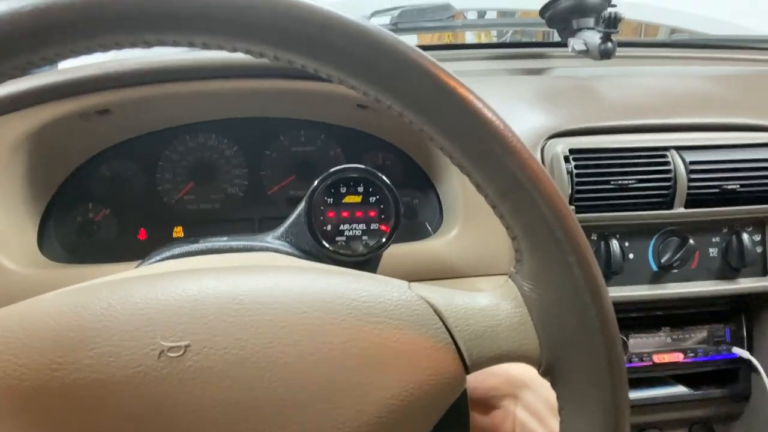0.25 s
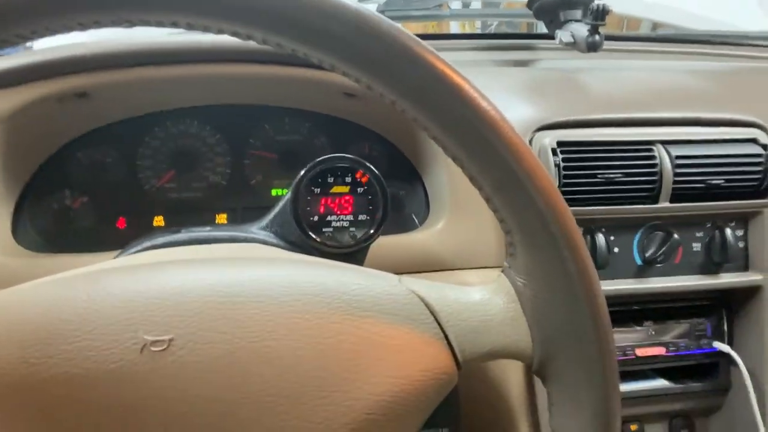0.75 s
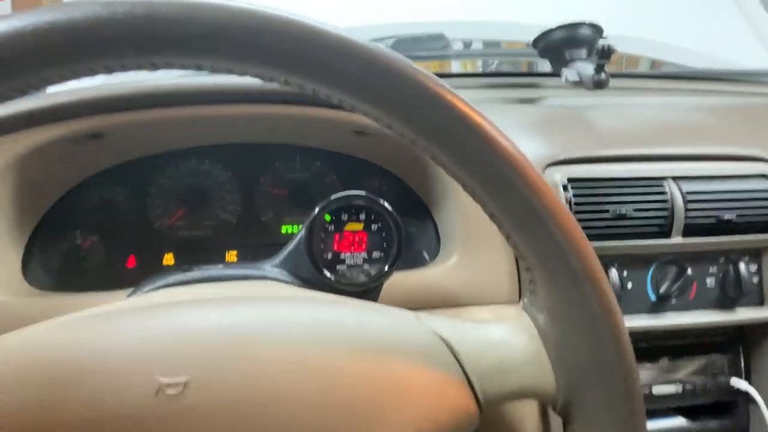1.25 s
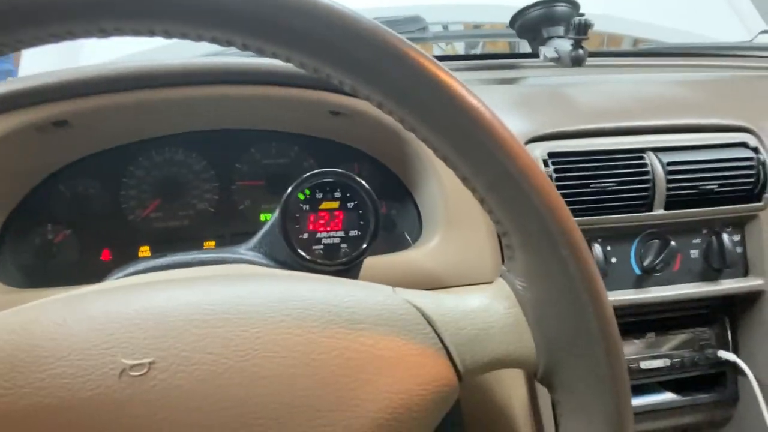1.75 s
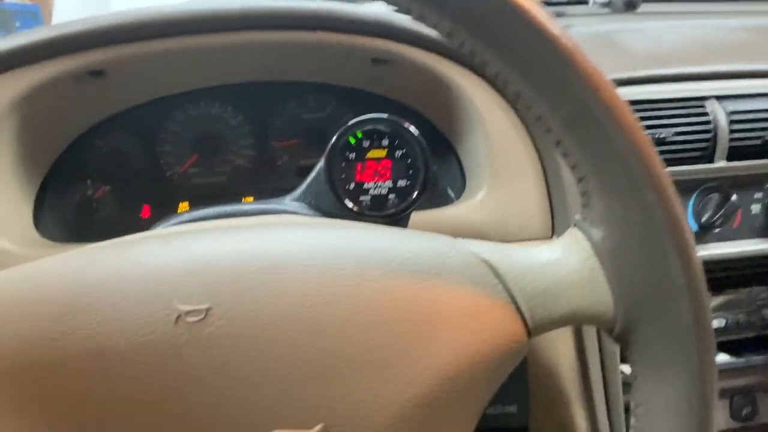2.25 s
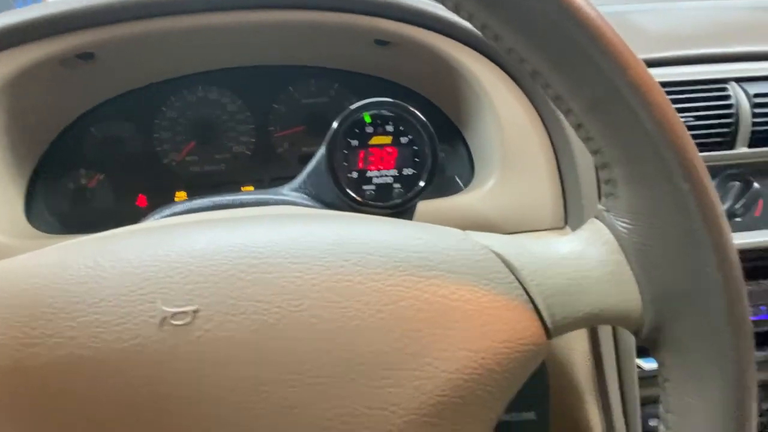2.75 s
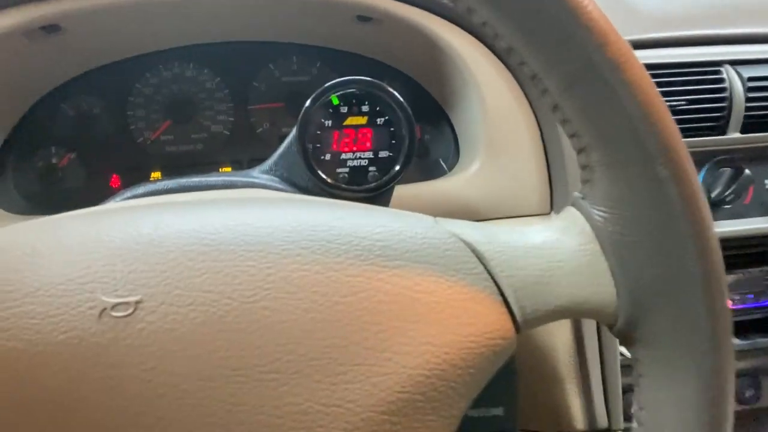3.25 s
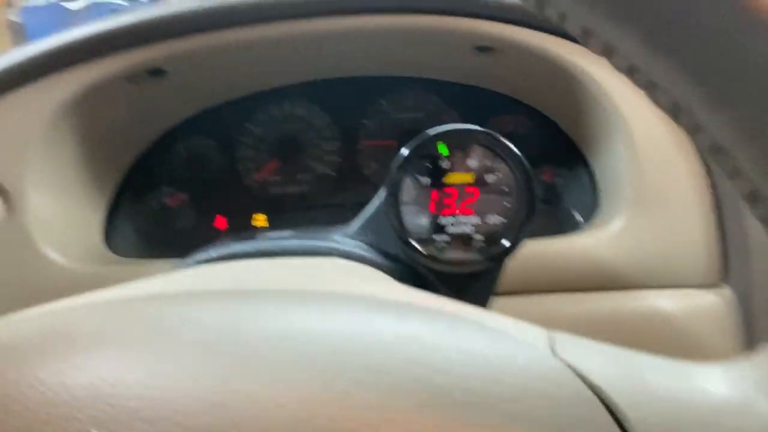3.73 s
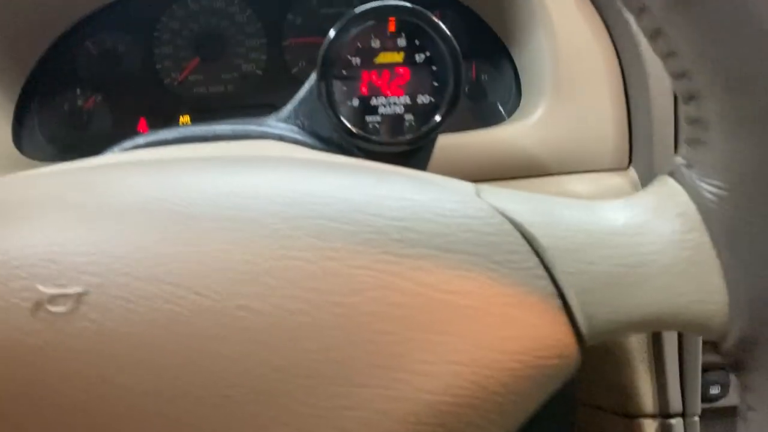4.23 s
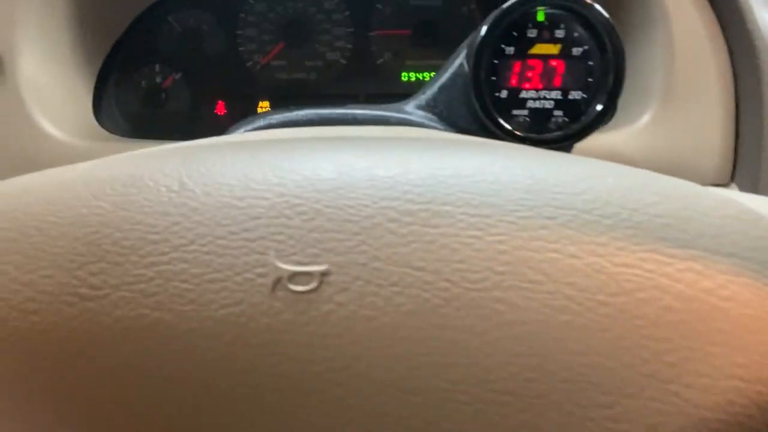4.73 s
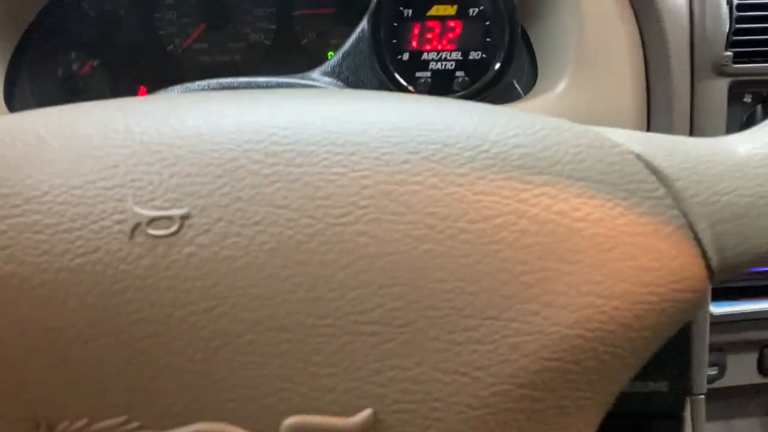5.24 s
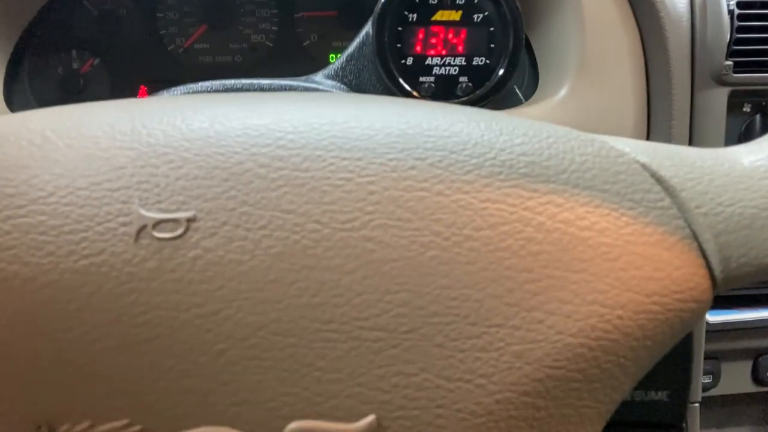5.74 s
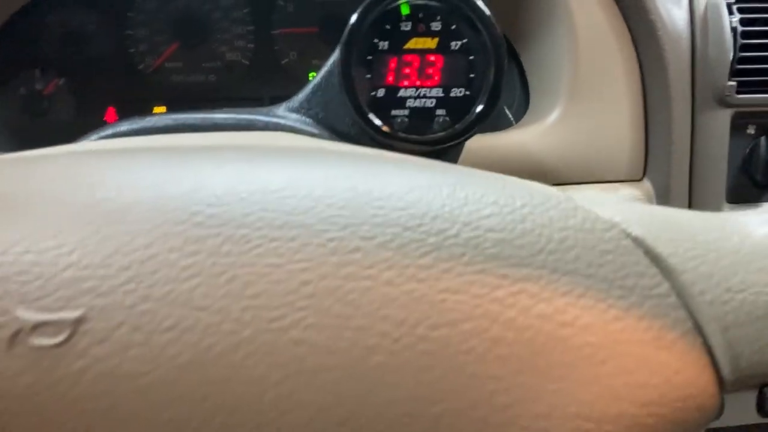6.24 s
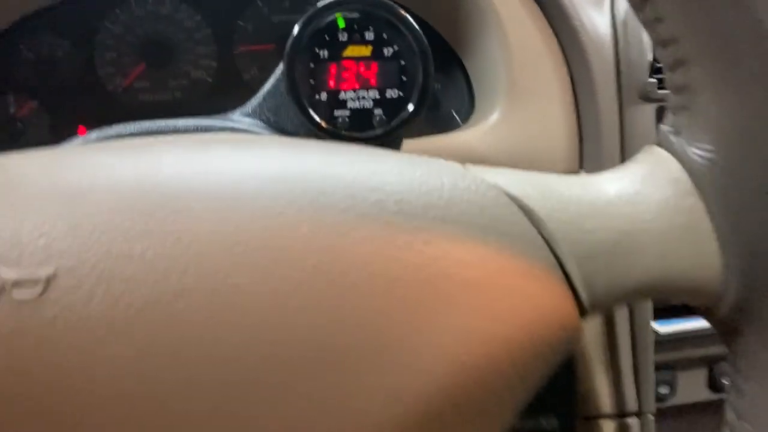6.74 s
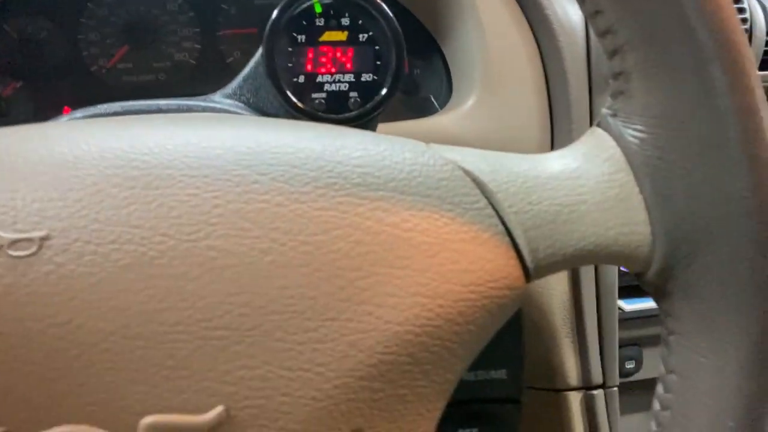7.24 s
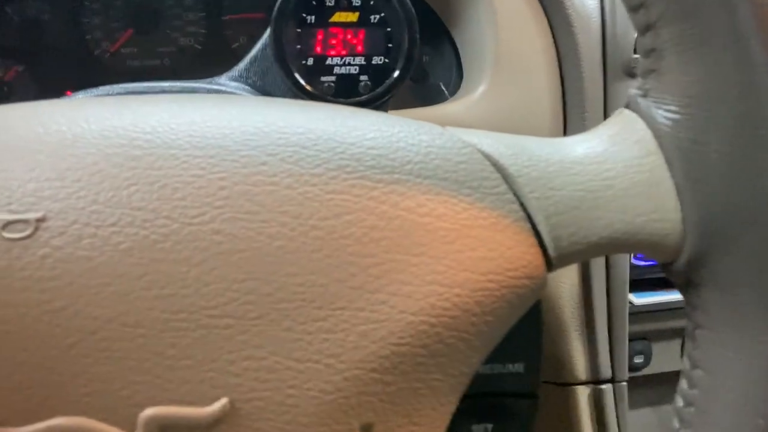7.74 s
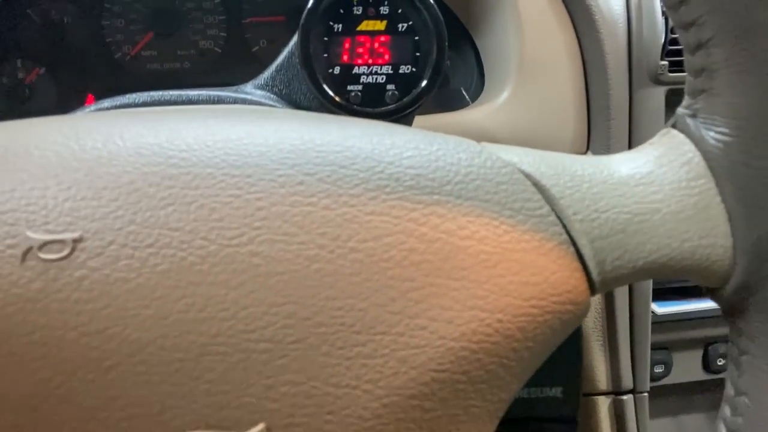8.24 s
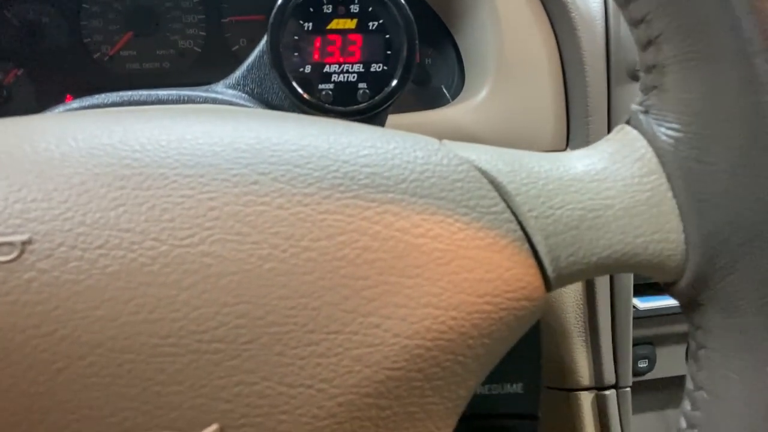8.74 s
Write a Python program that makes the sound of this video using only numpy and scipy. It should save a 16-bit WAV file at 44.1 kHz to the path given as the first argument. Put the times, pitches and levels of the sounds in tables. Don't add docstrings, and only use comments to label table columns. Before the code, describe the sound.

From the driver's seat in a closed garage, a short geared starter whine rides over lumpy cranking. Almost at once a big eight-cylinder engine catches with a bark and flares high, then falls until it nearly stalls. It shudders, pulls itself back up and holds a fast, uneven, burbling idle. Valve clatter, intake air and a fan hiss from behind the dashboard, with boomy room reverberation.

```python
import sys
import numpy as np
from scipy import signal
from scipy.fft import rfft, irfft, next_fast_len
from scipy.io import wavfile
from scipy.ndimage import uniform_filter1d, minimum_filter1d, map_coordinates

SR = 44100
rng = np.random.default_rng(int(sys.argv[2]) if len(sys.argv) > 2 else 0)


def put_to_file(sound):
    columns = np.atleast_2d(sound).T
    safe = np.clip(columns, -1, 1)
    whole_steps = np.round(safe * 32767)
    wavfile.write(sys.argv[1], SR, whole_steps.astype(np.int16))


def voltage_ratio(decibels):
    exponent = np.asarray(decibels, float) / 20
    return 10 ** exponent


N = 396018
TIME = np.arange(N) / SR

# start in seconds, whine level in dB, lump level in dB.
STROKES = [
    (0, -24, -22.5),
    (0.067, -31, -18.5),
    (0.149, -29, -19.5),
]
# centre in seconds, width in seconds, swell in dB.
SHUDDERS = [
    (.35, 0.052, 4.5),
    (.605, 0.045, 5.5),
    (.76, 0.097, 4),
    (2.33, 0.04, 4.5),
    (2.9, 0.028, 8),
    (3.15, 0.23, 7),
    (3.55, 0.17, 3.5),
]
CATCH_S, CATCH_WIDTH_S = 0.277, 0.046


def unit(x):
    return x / np.sqrt(np.mean(x ** 2) + 1e-20)


def even(x, window=12000):
    slow = uniform_filter1d(uniform_filter1d(x ** 2, size=window), size=window)
    return x / np.sqrt(np.abs(slow) + 1e-20)


def along(points, hz, axis=1):
    cols = np.transpose(points)
    return np.interp(np.log(hz + 1), np.log(cols[0] + 1), cols[axis])


def curves(rows):
    s, *cols = np.transpose(rows)
    return [np.interp(TIME, s, col) for col in cols]


def wobble(rate):
    knots = rng.standard_normal(int(N * rate / SR) + 4)
    return map_coordinates(knots, [np.arange(N) * rate / SR])


def bumps(rows):
    return sum(db * np.exp(-((TIME - s) / width) ** 2) for s, width, db in rows)


def filtered(x, response):
    m = next_fast_len(N + SR // 2)
    x = np.concatenate([x, x[..., :-SR // 10:-1]], axis=-1)
    return irfft(rfft(x, m) * response(np.fft.rfftfreq(m, 1 / SR)), m)[..., :N]


def sloped(spectrum):
    return lambda hz: voltage_ratio(along(spectrum, hz))


def modes(rows):
    def response(f):
        total = 0
        for k, (centre, width, db) in enumerate(rows):
            band = 1j * f * width
            total = total + (-1) ** k * voltage_ratio(db) * band / (centre ** 2 - f * f + band)
        return total
    return response


def dark_modes(rows, centre, width):
    return lambda hz: modes(rows)(hz) * modes([(centre, width, 0)])(hz)


def port_pair(hz):
    # frequency in Hz, left's phase lead in radians.
    lead = [(0, 0), (200, .4), (350, 1.2), (600, 2.5), (1460, 2.6), (2500, 5.5), (3700, 7.4), (4740, 10.6),
            (5680, 9.7), (6550, 11.4), (8000, 12.6), (10450, 15.7), (13050, 18.85), (15500, 22)]
    # frequency in Hz, left minus right in dB.
    lean = [(40, 0), (110, -.3), (200, -1), (370, -3.5), (690, .5), (1260, 1), (2320, .5), (7820, -.2),
            (14400, 0)]
    half = voltage_ratio(along(lean, hz) / 2) * np.exp(.5j * np.interp(hz, *np.transpose(lead)))
    return np.array([half, 1 / half])


def rush(colour):
    # frequency in Hz, level in dB.
    scattered = [(200, -17), (330, -1), (700, -3), (1500, -1), (3000, 7), (5500, 8), (7500, -6),
                 (14000, -45)]
    m = next_fast_len(N)
    hz = np.fft.rfftfreq(m, 1 / SR)
    z = rng.standard_normal((3, len(hz))) + 1j * rng.standard_normal((3, len(hz)))
    both = z[0] * port_pair(hz) + z[1:] * voltage_ratio(along(scattered, hz))
    return unit(irfft(both * colour(hz), m)[:, :N])


def answer(drive, idle_db, *per_db):
    return idle_db + np.dot(per_db, drive)


def strokes(axis, t60):
    rise_s = .008
    t = TIME - np.array(STROKES)[:, :1]
    level_db = np.array(STROKES)[:, axis, None]
    return np.sum(voltage_ratio(level_db - 60 * np.maximum(t / t60, -t / (6 * rise_s))), axis=0)


def starter():
    # frequency in Hz, width in Hz, level in dB.
    gears = [(1070, 51, 10), (1170, 52, 2.5), (1710, 250, -16), (2140, 39, -6)]
    # frequency in Hz, level in dB per Hz.
    crank = [(15, -23), (25, -1.5), (76, 6.5), (227, -5), (267, -1), (355, -9.5), (900, -23), (1170, -58),
             (1980, -120)]
    pinion = [(2900, 700, 0), (3650, 500, -2), (2100, 900, -5)]  # Hz, width Hz, dB
    whine, lumps, rasp = [filtered(rng.standard_normal(N), colour)
                          for colour in (modes(gears), sloped(crank), modes(pinion))]
    freewheel_t60_s = .3
    rest = voltage_ratio(-30.5 - 60 * np.maximum(TIME - .22, 0) / freewheel_t60_s)
    overrun = voltage_ratio(-37 - 60 * np.maximum(TIME - 0.557, 0) / freewheel_t60_s)
    out = strokes(axis=1, t60=0.099) * even(whine, window=500)
    out += (strokes(axis=2, t60=0.24) + rest) * even(lumps)
    return out + overrun * unit(rasp)


def valve_gear(drive, breath_db, shake_db):
    # frequency in Hz, level in dB per Hz.
    metal = [(500, -84), (800, -3), (1050, -0.5), (1350, -4.5), (1620, 4.5), (2100, -3), (2560, -5.5),
             (2800, -13), (4000, -12), (5000, -22), (7000, -72)]
    # frequency in Hz, width in Hz, level in dB.
    covers = [(1020, 19, 1), (1263, 21, 6), (1456, 12, 7.5), (1600, 60, -20), (2556, 26, -3.5),
              (2860, 16, 7), (3120, 25, -4)]
    level_db = answer(drive, -36, 0.36, 0.3267, 0.36) + shake_db + breath_db + 0.75 * wobble(10)
    return voltage_ratio(level_db) * rush(lambda hz: sloped(metal)(hz) * (1 + np.abs(modes(covers)(hz))))


def intake(drive, breath_db):
    # frequency in Hz, level in dB per Hz.
    air = [(3000, -26), (4500, -6), (5200, -7), (6500, -2), (7900, 1), (9000, -0.5), (10000, -13),
           (12000, -64)]
    level_db = answer(drive, -45.5, 0.1, 0.8048, 0.06) + .5 * breath_db + 0.17 * wobble(12)
    return voltage_ratio(level_db) * rush(sloped(air))


def thin_hiss(drive, breath_db, shake_db):
    # frequency in Hz, level in dB per Hz.
    thin = [(8000, -52), (9500, -4), (10500, -4.5), (12000, -6.5), (14000, -10.5), (15700, -18),
            (17000, -34)]
    fan_on_s, fan_rise_s, fan_db = 2.1, .15, 6
    level_db = answer(drive, -58.5, 0.74, 0.93, 0) + shake_db + .7 * breath_db + 1.2 * wobble(30)
    level_db += fan_db * np.clip((TIME - fan_on_s) / fan_rise_s, 0, 1)
    level_db += bumps([(2.9, 0.54, 6.9)])
    return voltage_ratio(level_db) * rush(sloped(thin))


def panels(drive):
    # frequency in Hz, width in Hz, level in dB.
    drone = [(352, 70, -1.5), (410, 26.6, -1), (522.4, 30.5, -3.5), (555.6, 15, -2), (611, 52, -7.5)]
    level_db = answer(drive, -32.5, 0.72, .5, 0.43) + bumps(SHUDDERS) + 1.5 * wobble(9)
    return voltage_ratio(level_db) * rush(dark_modes(drone, 520, 500))


def heat_shield(drive):
    # frequency in Hz, width in Hz, level in dB.
    sheet = [(747, 36, 0.5), (792, 42, -4.5)]
    level_db = answer(drive, -39.5, 2, 0.21, -0.2) + 1.8 * wobble(7)
    return voltage_ratio(level_db) * rush(dark_modes(sheet, 775, 200))


def bay(firings, drive):
    breath_db = .4 * np.sin(2 * np.pi * firings / 8) + .2 * wobble(7)
    shake_db = 7.5 * strokes(axis=2, t60=0.42) / voltage_ratio(STROKES[0][2])
    out = valve_gear(drive, breath_db, shake_db) + intake(drive, breath_db)
    return out + thin_hiss(drive, breath_db, shake_db) + heat_shield(drive) + panels(drive)


def firing_pushes(firings):
    cylinders = [0.89, -0.58, -1.1, 0.25, -0.15, 0.85, 0.87, -0.38]
    at = np.flatnonzero(np.diff(np.floor(firings)))
    pushes, late = np.zeros((2, N))
    pushes[at] = np.resize(cylinders, len(at)) + .33 * rng.standard_normal(len(at))
    late[at] = .33 * (-1.) ** np.arange(len(at))
    return pushes + np.roll(late, round(0.0026 * SR))


def firing_boom(firings, rate_hz, drive):
    # frequency in Hz, gain in dB.
    cabin = [(30, -2), (47, 7.5), (57, 0.5), (70, 0.5), (85, -4.5), (102, 5.5), (119, 0.5)]
    level_db = answer(drive, -14, 0.93, -0.24, 0.53) + along(cabin, rate_hz)
    level_db += bumps([(CATCH_S, CATCH_WIDTH_S, 9.5)]) + .5 * wobble(9)
    return np.sqrt(2) * np.sin(2 * np.pi * firings + 1.3) * voltage_ratio(level_db)


def flare_rings():
    # centre in seconds, width in seconds, frequency in Hz, peak in dB.
    swells = [
        (.365, .035, 197, -11),
        (.44, .04, 192, -13),
    ]
    return sum(voltage_ratio(db) * bumps([(s, width, 1)]) * np.sin(2 * np.pi * hz * TIME)
               for s, width, hz, db in swells)


def body_shake():
    # frequency in Hz, level in dB per Hz.
    shake = [(3, -9), (20, -6), (60, 10.5), (150, 5), (300, -43)]
    return voltage_ratio(-23) * unit(filtered(rng.standard_normal(N), sloped(shake)))


def exhaust(firings, drive):
    # frequency in Hz, width in Hz, level in dB.
    thump_modes = [(43.8, 19.3, 13.5), (53, 10, 9)]
    burble_modes = [(96.6, 11.7, -2.5), (111.6, 13, 1.5), (122.6, 8.7, -2)]
    bark_modes = [(161.1, 3.4, -4.5), (186.9, 13.4, -1.5), (197.7, 10.5, 4), (214.8, 18.5, -5.5),
                  (237.9, 8.3, 2.5), (269, 12, -24)]
    ring_modes = [(289.1, 16.8, -6.5), (308, 18.3, -4), (324.2, 9.6, -6)]
    burble, thump = dark_modes(burble_modes, 110, 40), dark_modes(thump_modes, 48, 18)
    bark, ring = dark_modes(bark_modes, 205, 160), dark_modes(ring_modes, 305, 90)

    burble_db = answer(drive, -11.5, 1.17, -.1, -0.55)
    thump_db = answer(drive, -22, .1, -0.035, -0.2)
    thump_db += bumps([(CATCH_S, CATCH_WIDTH_S, -3)]) + 0.75 * bumps(SHUDDERS)
    bark_db = answer(drive, -18, 1.4, -0.32, 0.71)
    bark_db += bumps([(0.34, 0.11, 7.5)])
    ring_db = answer(drive, -24, .55, 0.0665, 2) + bumps(SHUDDERS)

    def stiff_thump(hz):
        return thump(hz) * (1j * hz / (36 + 1j * hz)) ** 4

    pushes = firing_pushes(firings)
    pipes = voltage_ratio(burble_db) * even(filtered(pushes, burble))
    pipes += voltage_ratio(thump_db) * even(filtered(pushes, stiff_thump))
    pipes += voltage_ratio(bark_db + 0.5) * even(filtered(pushes, bark))
    pipes += voltage_ratio(ring_db - 1) * even(filtered(pushes, ring))
    gas = voltage_ratio(bark_db - 9) * rush(bark) + voltage_ratio(ring_db - 4) * rush(ring)
    return pipes, gas


def ticks():
    # start in seconds, peak in dB, centre in Hz.
    clicks = [
        (2.468, -38, 12600),
        (3.021, -25, 3000),
    ]
    out, t = np.zeros(N), np.arange(800) / SR
    for s, db, hz in clicks:
        grit = uniform_filter1d(rng.standard_normal(len(t)), size=9) * 3
        out[round(s * SR):][:len(t)] += voltage_ratio(db - 60 * t / .02) * grit * np.sin(2 * np.pi * hz * t)
    return out


def garage(x):
    # frequency in Hz, t60 in seconds, level in dB.
    room = [(40, 0.98, -33), (93.5, 0.73, -12.5), (184, 0.99, -6.5), (340, 0.4, -7.5), (1510, 0.13, 11.5),
            (8100, 0.5, -8)]
    hz, t, z = signal.stft(rng.standard_normal((2, SR // 2)), SR, nperseg=256)
    decay = voltage_ratio(-60 * t / along(room, hz)[:, None])
    decay = decay / np.linalg.norm(decay, axis=1, keepdims=True)
    tail = signal.istft(z * decay, SR, nperseg=256)[1]
    wet = signal.fftconvolve(x[None], tail / np.linalg.norm(tail[0]), axes=1)[:, :N]
    return filtered(wet, lambda hz: voltage_ratio(along(room, hz, axis=2)))


def scene():
    # time in seconds, firings a second.
    speed = [(.2, 28.5), (.24, 38), (.31, 52), (.41, 79), (.5, 102), (.6, 112), (.7, 119), (1.1, 104.9),
             (1.5, 86.8), (2.1, 55.5), (2.5, 44.5), (2.7, 45.4), (2.9, 51.7), (3.1, 66.7), (3.3, 73.2),
             (3.7, 76.1), (4.35, 70.4), (8.94, 70.7)]
    # time in seconds, combustion load in dB, intake draw in dB.
    effort = [(0, -3, 15.5), (.22, -17, 19), (.3, -1, 20.5), (.37, -1.5, 23), (.41, 4, 17.5), (.5, 0, 21),
              (.63, -2, 13.5), (.67, -6, 9), (.92, -4, 4.5), (1.5, -5.5, 0.5), (1.7, -4.5, -4),
              (2.5, -7, -5.5), (2.85, -5.5, -5), (3.07, -2.5, 0.5), (3.65, 0, 2.5), (4.25, -1, 0),
              (5.5, -1, 0.5), (8.98, 0, 0)]
    idle_hz, hunt_hz, hunt_s, hunt_peak_s = 70.5, .6, .69, 6.8
    rate_hz = curves(speed)[0] + hunt_hz * np.cos(2 * np.pi * (TIME - hunt_peak_s) / hunt_s)
    firings = np.cumsum(rate_hz) / SR
    drive = np.array([*curves(effort), 20 * np.log10(rate_hz / idle_hz)])
    running = np.clip((TIME - 0.21) / 0.014, 0, 1)
    pipes, gas = exhaust(firings, drive)
    engine = firing_boom(firings, rate_hz, drive) + pipes + flare_rings() + body_shake()
    near = starter() + running * engine + ticks()
    return filtered(near, port_pair) + garage(near) + running * gas + bay(firings, drive)


def roll_off(x):
    return signal.sosfilt(signal.butter(12, 15750, fs=SR, output="sos"), x)


def record(dry):
    need = np.minimum(1, .93 / (np.abs(dry).max(axis=0) + 1e-9))
    mix = dry * uniform_filter1d(minimum_filter1d(need, size=3001), size=3001)
    mix = mix * np.clip((N - np.arange(N)) / (.008 * SR), 0, 1)
    return roll_off(mix)


dry = scene()
out = record(dry)
put_to_file(out)
```